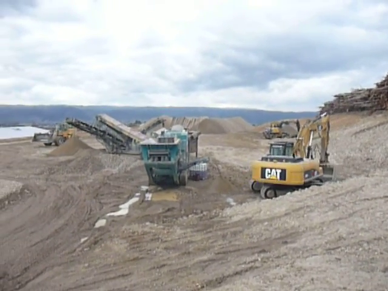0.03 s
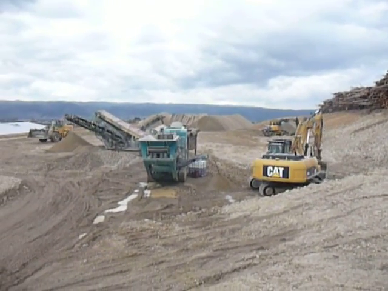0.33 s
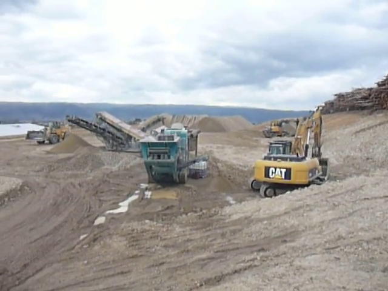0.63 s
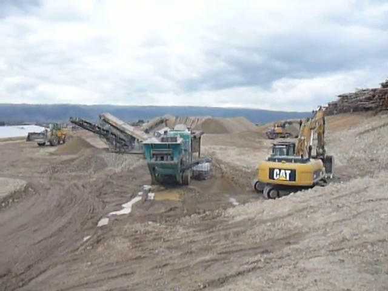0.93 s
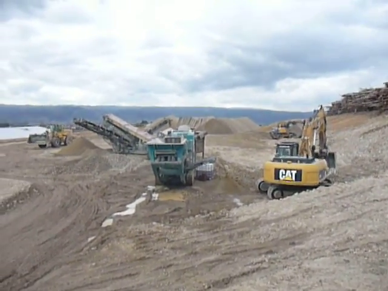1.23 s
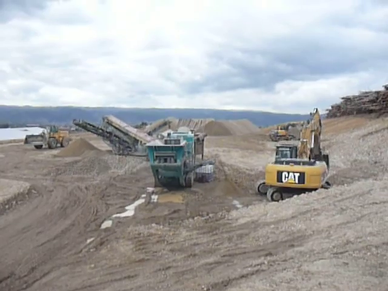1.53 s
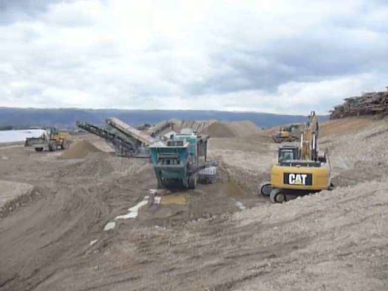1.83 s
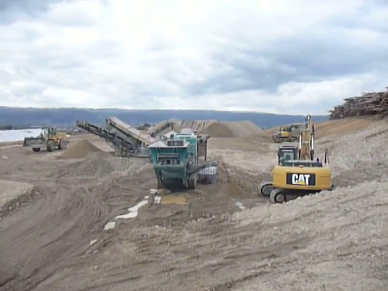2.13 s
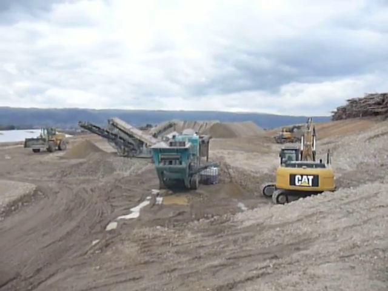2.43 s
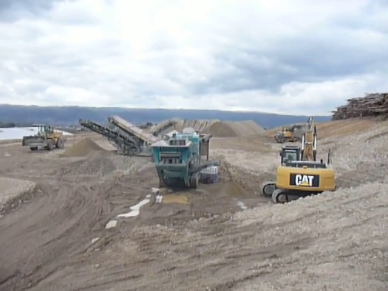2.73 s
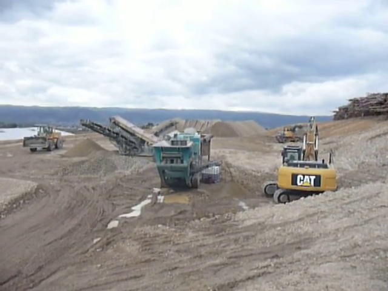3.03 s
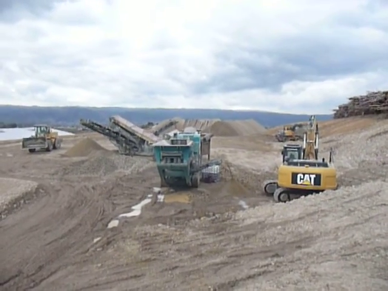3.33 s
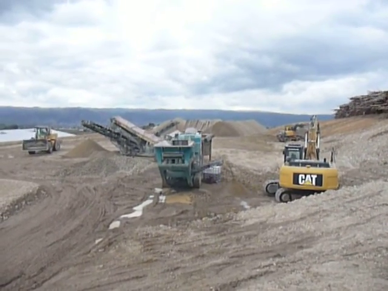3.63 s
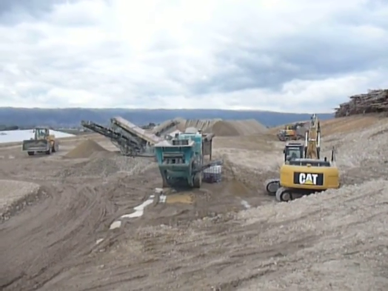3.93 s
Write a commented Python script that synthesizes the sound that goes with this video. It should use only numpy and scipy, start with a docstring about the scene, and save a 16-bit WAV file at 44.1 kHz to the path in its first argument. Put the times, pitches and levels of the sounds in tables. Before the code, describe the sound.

A rock crusher roars continuously, some way off in an open quarry. Irregular thuds, knocks and stony clacks stand out while gravel rattles on steel and diesel engines drone underneath. The microphone makes it slightly muffled.

```python
"""A dense roar of rock tumbling through a mobile crusher, some way off in an open quarry.
Dull knocks and stony clacks stand out of it, and gravel rattles on steel.
Underneath, the diesels of the crusher, an excavator and a farther machine drone and beat
against each other over the slow shake of a screen. A narrow-band microphone hears it."""
import sys
import numpy as np
from scipy import signal
from scipy.fft import rfft, irfft
from scipy.io import wavfile
from scipy.ndimage import uniform_filter1d

SR = 44100
rng = np.random.default_rng(int(sys.argv[2]) if len(sys.argv) > 2 else 0)


def bounce(signal):
    """Save signal as a 16-bit WAV file at the path given by the first command-line argument."""
    frames = np.transpose(np.atleast_2d(signal))
    limited = np.clip(frames, -1, 1)
    pcm = np.round(limited * 32767).astype(np.int16)
    wavfile.write(sys.argv[1], SR, pcm)


N = 176400
T = np.arange(N) / SR


def amp(db):
    """Decibels to gain."""
    return 10 ** (np.asarray(db) / 20)


def unit(x):
    """Scales to rms 1."""
    return x / np.sqrt(np.mean(x ** 2) + 1e-20)


def read(points, hz):
    """Reads a curve on a log-frequency axis."""
    f, value = np.transpose(points)
    return np.interp(np.log(hz + 1), np.log(f + 1), value)


def colour(x, points):
    """Filters by the dB curve in points, to rms 1."""
    gain = amp(read(points, np.fft.rfftfreq(len(x), 1 / SR)))
    return unit(irfft(rfft(x) * gain, len(x)))


def drift(rate_hz):
    """Slow random motion of rms 1, up to about rate_hz."""
    hz = np.fft.rfftfreq(2 * N, 1 / SR)[:2000]
    z = rng.standard_normal(len(hz)) + 1j * rng.standard_normal(len(hz))
    return unit(irfft(z * np.exp(-(hz / rate_hz) ** 2), 2 * N)[:N])


def add(mix, start_s, sound):
    """Mixes a sound in at start_s."""
    part = mix[round(start_s * SR):][:len(sound)]
    part += sound[:len(part)]


def lowpass(x, hz):
    """Steep low-pass."""
    return signal.oaconvolve(x, signal.firwin(511, hz, window=("kaiser", 9), fs=SR), "same")


def machine(rate_hz, orders, hunt, waver_hz):
    """Orders of one shaft whose speed hunts a little; each wavers on its way through the air."""
    turns = np.cumsum(rate_hz * (1 + hunt * drift(2.42))) / SR
    out = np.zeros(N)
    for multiple, db, waver_db in orders:
        waver = amp(waver_db * drift(waver_hz))
        tone = np.sin(2 * np.pi * (multiple * turns + rng.random()))
        out += amp(db) * unit(waver * tone)
    return out


# Far engine tones. Each row: multiple of the firing rate, level in dB, waver in dB.
FAR_ORDERS = [(0.988, -43.5, 1), (2, -44.5, 1.1), (3.95, -47.5, 2), (5.065, -48, 2), (20.8, -51.5, 2)]


def far_diesel(firing_hz=76.85):
    """A slower engine droning further off."""
    return machine(firing_hz, FAR_ORDERS, hunt=.0008, waver_hz=4.6)


# Screen tones. Each row: multiple of the stroke rate, level in dB, waver in dB.
SCREEN_ORDERS = [(2, -37.5, .8), (3, -52.5, 0.96), (4, -52, 0.97), (8, -44, 0.98)]


def screen(stroke_hz=14.43):
    """The shaking screen hums at multiples of its stroke."""
    return machine(stroke_hz, SCREEN_ORDERS, hunt=.002, waver_hz=3.3)


# Excavator tones. Each row: multiple of the firing rate, level in dB, waver in dB.
EXCAVATOR_ORDERS = [(1, -36.5, 1.2), (2, -40.5, 2.5), (3, -44.5, 2.5)]


def excavator_diesel(firing_hz=88.4):
    """A low firing note with unsteady speed."""
    return machine(firing_hz, EXCAVATOR_ORDERS, hunt=.017, waver_hz=7.6)


# Crusher engine tones. Each row: multiple of the crank speed, level in dB, waver in dB.
CRUSHER_ORDERS = [(3.008, -28.5, 1.2), (8.93, -47.5, 2), (10.98, -37, 1.5), (11.95, -45.5, 2),
                  (13.07, -44.5, 1.5), (13.94, -47, 2.3), (16.03, -47.5, 2.3), (19.04, -47, 2),
                  (51.15, -55, 1.5)]
# Octave of the firing note. Each row: time in seconds, level in dB.
OCTAVE_LEVEL = [(0, -37.5), (.3, -34), (.6, -30.5), (.85, -34), (1.1, -28), (1.37, -40), (1.6, -26.5),
                (1.77, -37), (2.0, -28), (2.35, -37.5), (2.6, -29), (2.85, -36), (3.1, -31), (3.4, -33),
                (3.7, -28), (4, -35.5)]


def crusher_diesel(crank_hz=32.42):
    """Fires three times a turn; the octave of that note comes and goes."""
    drone = machine(crank_hz, CRUSHER_ORDERS, hunt=.0008, waver_hz=3.6)
    octave = machine(crank_hz, [(6, 0, 1.5)], hunt=.001, waver_hz=6)
    return drone + octave * amp(np.interp(T, *np.transpose(OCTAVE_LEVEL)))


# Rattle spectrum. Each row: frequency in Hz, relative level in dB.
GRAVEL_SPECTRUM = [(300, -11.5), (650, -1), (1250, -11), (2400, -9.5), (3600, -17), (4400, -41)]


def gravel(level_db=-40, hits_per_s=200, spread_db=2, t60_s=.068, patches=12):
    """Small stones fall at random on steel patches, each with its own short ring."""
    t = T[:SR // 8]
    falls = rng.random(N) < hits_per_s / SR
    hits = falls * amp(spread_db * np.minimum(rng.exponential(1, N), 3))
    struck = rng.integers(0, patches, N)
    rings = rng.standard_normal((patches, len(t))) * amp(-60 * t / t60_s)
    rattle = sum(signal.oaconvolve(hits * (struck == k), rings[k])[:N] for k in range(patches))
    return amp(level_db) * colour(rattle, GRAVEL_SPECTRUM)


def blow(db, hz, width_octaves, t60_s, rise_s):
    """One distant impact: a crowd of modes around hz that rises quickly and dies."""
    t = T[:SR // 4]
    f = np.fft.rfftfreq(len(t), 1 / SR)
    strength = np.exp(-.5 * (np.log2((f + 1) / hz) / width_octaves) ** 2)
    modes = strength * np.exp(2j * np.pi * rng.random(len(f)))
    envelope = np.minimum(t / rise_s, 1) * amp(db - 60 * t / t60_s)
    return unit(irfft(modes, len(t))) * envelope


# Boulders in the hopper. Each row: start in seconds, level in dB.
THUDS = [(0.696, -24.5), (1.497, -26), (1.72, -17), (2.081, -25), (2.396, -24.5), (2.434, -24),
         (2.661, -22), (3.12, -21.5), (3.386, -26.5)]
# Rocks in the jaws. Each row: start in seconds, level in dB.
KNOCKS = [(.134, -19), (.779, -23), (1.14, -25), (1.307, -29), (1.76, -32), (1.9, -17), (2.071, -21.5),
          (2.388, -24), (3.325, -28), (3.385, -26)]
# Stones on steel. Each row: start in seconds, level in dB, pitch in Hz.
CLACKS = [(.731, -31.5, 2450), (.735, -33.5, 3420), (.755, -29.5, 2300), (.803, -33, 2480),
          (.929, -36, 2300), (1.035, -28, 2320), (1.073, -43, 2400), (1.245, -30.5, 2600),
          (1.963, -36, 2400), (2.242, -28.5, 2300), (2.452, -32.5, 2500), (2.52, -46, 2300),
          (2.88, -36, 2600), (3.033, -41, 2300)]


def rocks():
    """Large pieces thud in the hopper, break in the jaws and clack on steel."""
    out = np.zeros(N)
    for start_s, db in THUDS:
        add(out, start_s, blow(db, hz=275, width_octaves=.28, t60_s=.14, rise_s=.0027))
    for start_s, db in KNOCKS:
        add(out, start_s, blow(db, hz=640, width_octaves=.5, t60_s=.09, rise_s=.003))
    for start_s, db, hz in CLACKS:
        add(out, start_s, blow(db, hz, width_octaves=.17, t60_s=.055, rise_s=.004))
    return out


# Rock and fan spectrum. Each row: frequency in Hz, relative density in dB.
ROAR_SPECTRUM = [(15, -28), (40, -20), (65, -5.5), (100, -3.5), (135, -1), (180, -2), (220, -3), (270, 1),
                 (390, -6.5), (480, -9.5), (650, -4), (850, -12), (1000, -11.5), (1260, -18), (1520, -16),
                 (2100, -20), (2300, -19), (2650, -22.5), (2950, -21.5), (3200, -27), (3600, -29),
                 (4000, -38), (4400, -54)]
# Band swells, used about each band's mean. Each row: time in seconds, low, middle and treble in dB.
ROAR_SWELLS = [(0, -30, -31, -39.5), (.2, -27.5, -30.5, -39.5), (.62, -27.5, -29, -40),
               (.7, -28, -32, -40.5), (.9, -31, -28.5, -38), (1.1, -25, -29, -38),
               (1.33, -30.5, -30.5, -40.5), (1.72, -27.5, -28.5, -38), (1.95, -28, -30, -38.5),
               (2.22, -28.5, -29.5, -39.5), (2.4, -26, -28.5, -37), (2.62, -30, -29, -38.5),
               (2.77, -29.5, -32, -41.5), (2.95, -26.5, -31.5, -37), (3.2, -28.5, -31, -41.5),
               (3.4, -28, -31, -39), (3.55, -29.5, -31.5, -41), (4, -25.5, -31, -40)]


def roar(level_db=-25, patch_db=1.2, flicker_db=1.0):
    """Tumbling rock and fan noise swells in three bands; the upper two are patchy and flicker."""
    noise = colour(rng.standard_normal(N), ROAR_SPECTRUM)
    hz, t, spectra = signal.stft(noise, SR, nperseg=512, noverlap=384)
    low = read([(100, 0), (200, 1), (380, 1), (550, 0)], hz)[:, None]
    middle = read([(380, 0), (550, 1), (900, 1), (1900, 0)], hz)[:, None]
    treble = read([(900, 0), (1900, 1)], hz)[:, None]
    times_s, *bands_db = np.transpose(ROAR_SWELLS)
    swell_db = sum(share * np.interp(t, times_s, db - db.mean())
                   for share, db in zip((low, middle, treble), bands_db))
    patches = uniform_filter1d(rng.standard_normal(spectra.shape), size=7, axis=0)
    patches = unit(uniform_filter1d(patches, size=16, axis=1))
    flicker = np.interp(t, T, drift(rate_hz=39))
    gain_db = swell_db + (middle + treble) * (patch_db * patches + flicker_db * flicker)
    churn = signal.istft(spectra * amp(gain_db), nperseg=512, noverlap=384)[1][:N]
    return amp(level_db) * churn


def scene():
    """The whole plant from the quarry's edge."""
    drone = crusher_diesel() + excavator_diesel() + far_diesel() + screen()
    return (drone + roar() + gravel() + rocks())[None]


def record(dry):
    """A narrow-band microphone rounds the highest peaks; one tiny sharp tick sounds above its band."""
    ceiling, mic_hz, edge_hz, fade_in_s = .43, 4450, 15800, .004
    tick_s, tick_db, tick_decay_s = 1.4233, -20, .0003
    rounded = dry[0] / (1 + (dry[0] / ceiling) ** 6) ** (1 / 6)
    heard = lowpass(rounded, mic_hz) * np.minimum(T / fade_in_s, 1)
    add(heard, tick_s, amp(tick_db) * np.exp(-T[:SR // 100] / tick_decay_s))
    return lowpass(heard, edge_hz)[None]


dry = scene()
out = record(dry)
bounce(out)
```